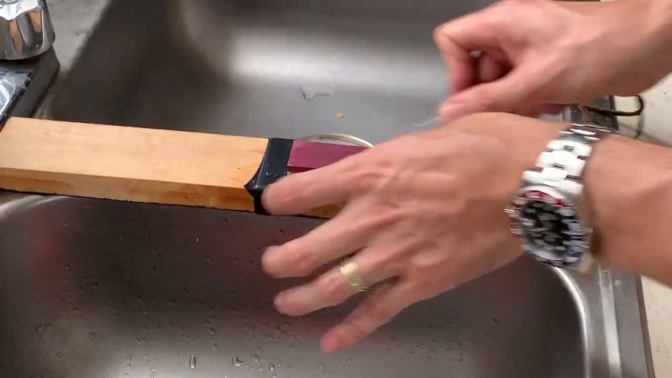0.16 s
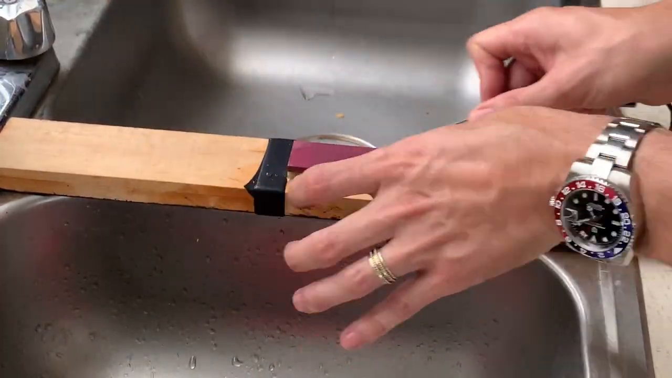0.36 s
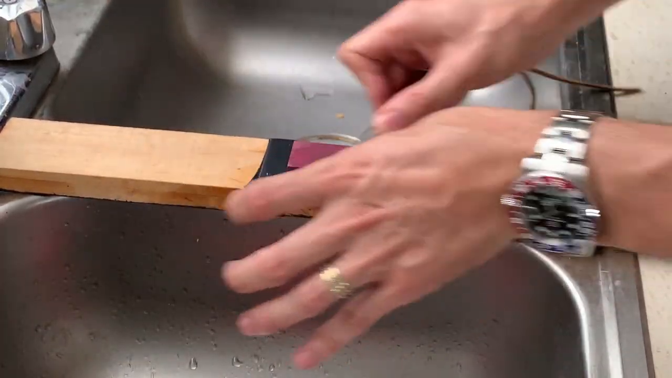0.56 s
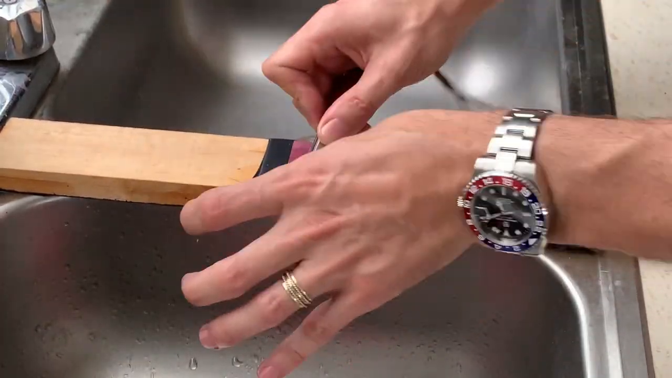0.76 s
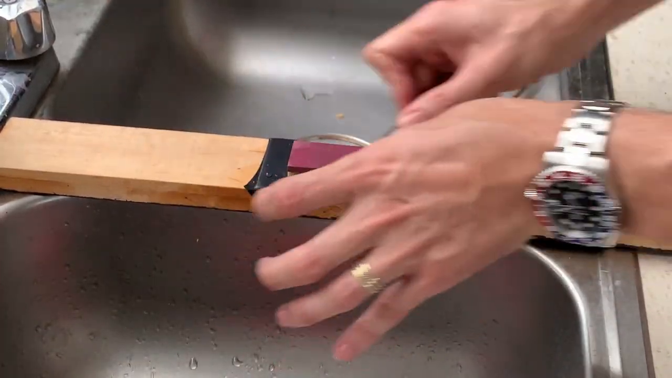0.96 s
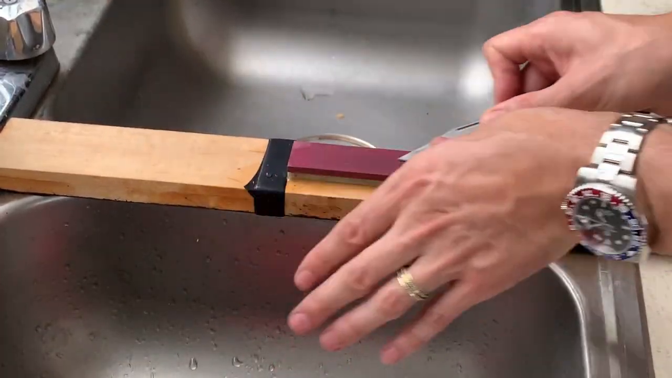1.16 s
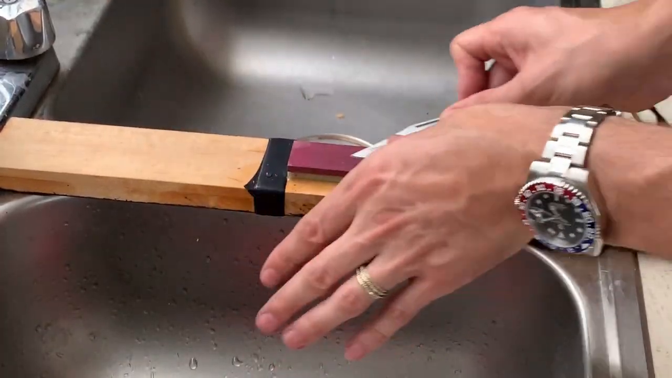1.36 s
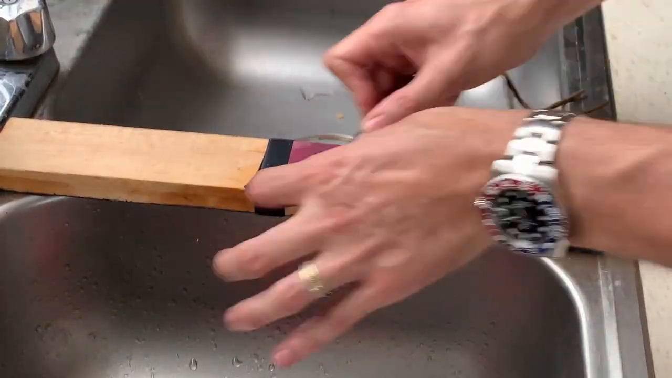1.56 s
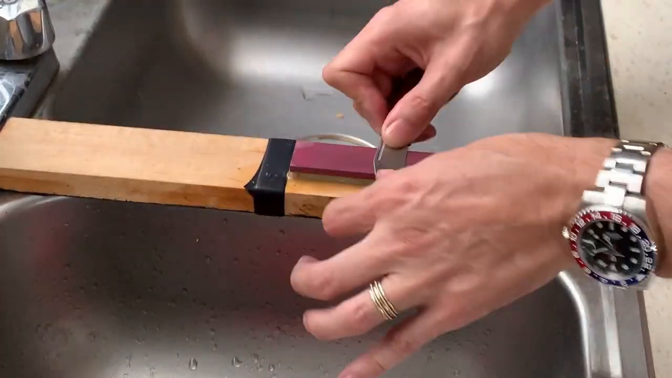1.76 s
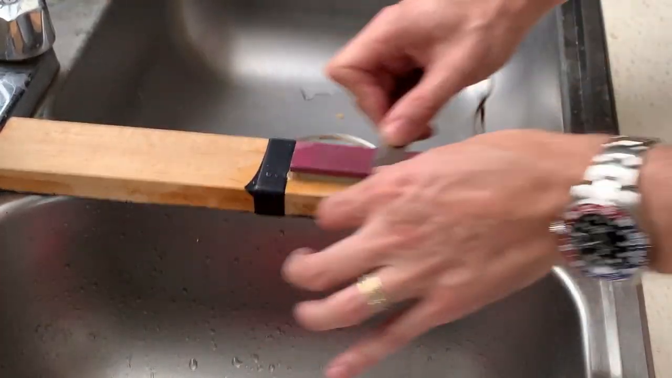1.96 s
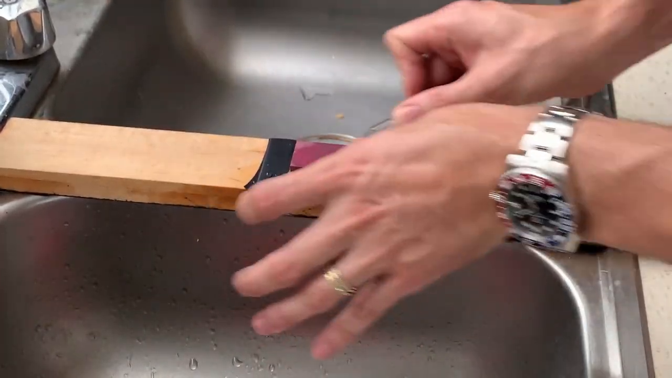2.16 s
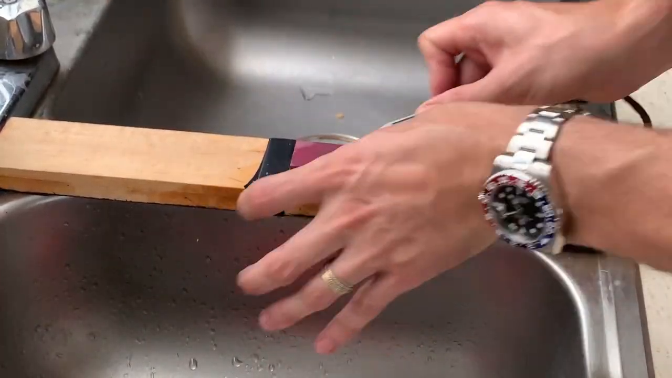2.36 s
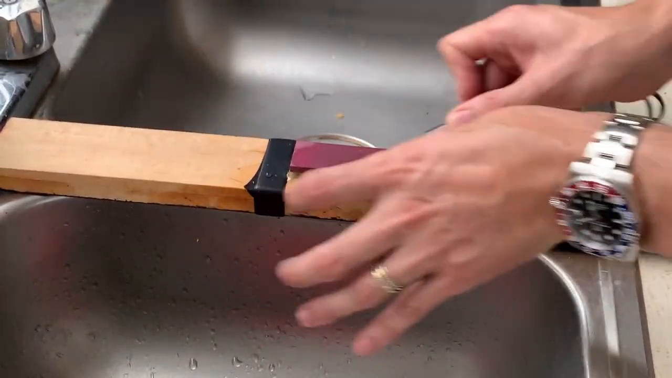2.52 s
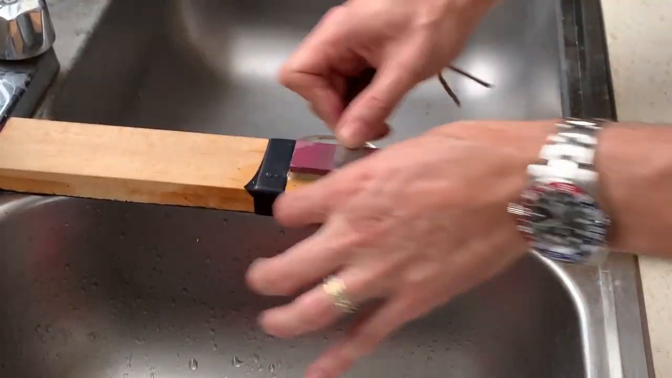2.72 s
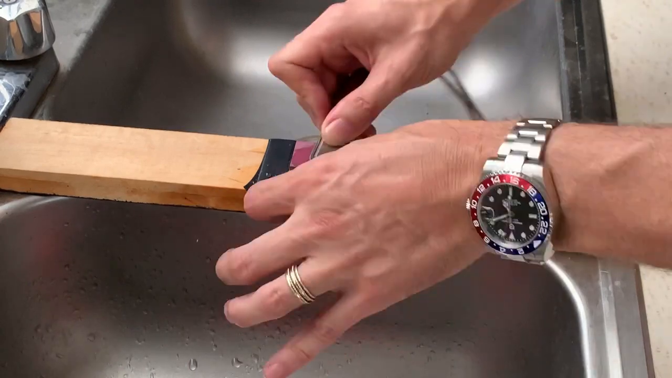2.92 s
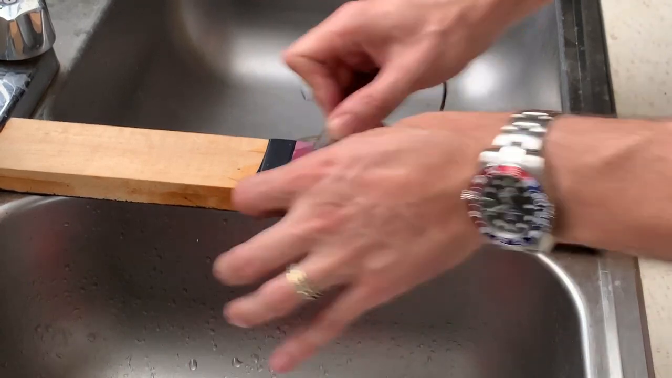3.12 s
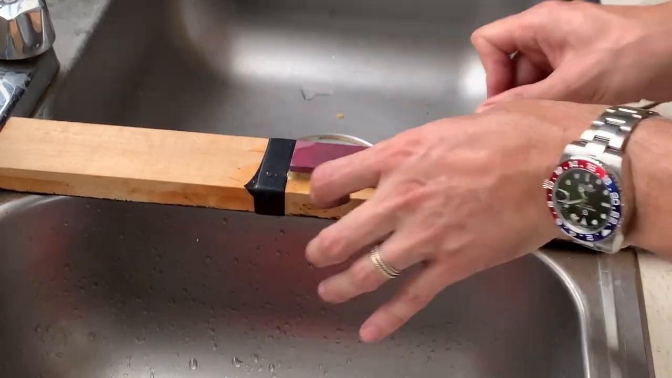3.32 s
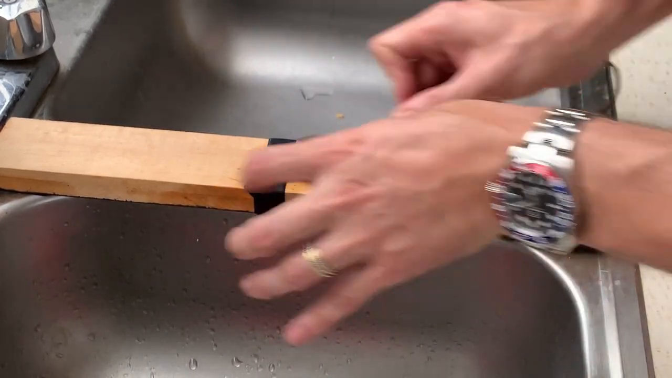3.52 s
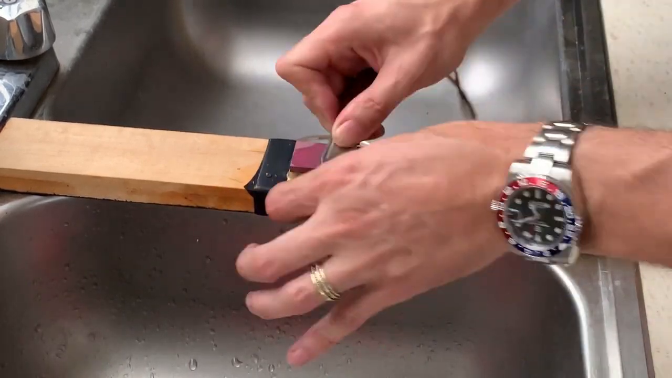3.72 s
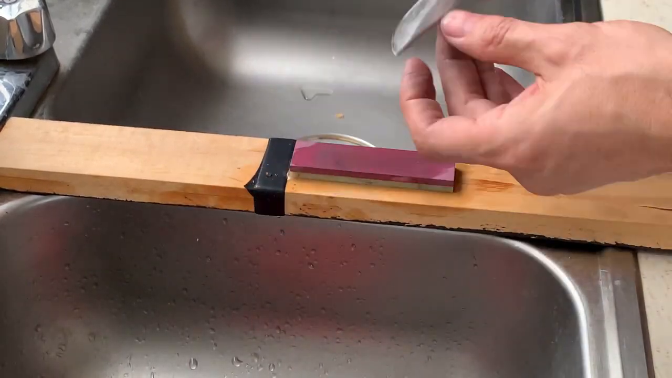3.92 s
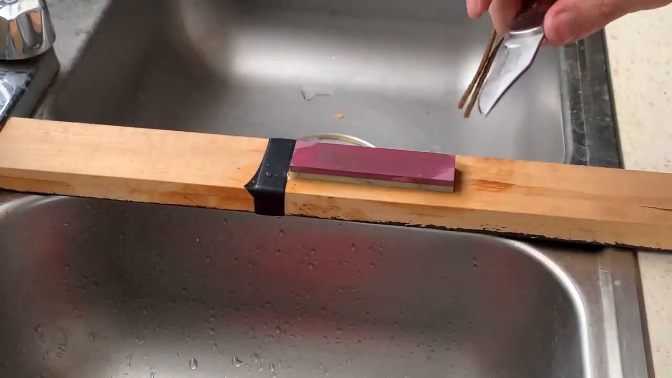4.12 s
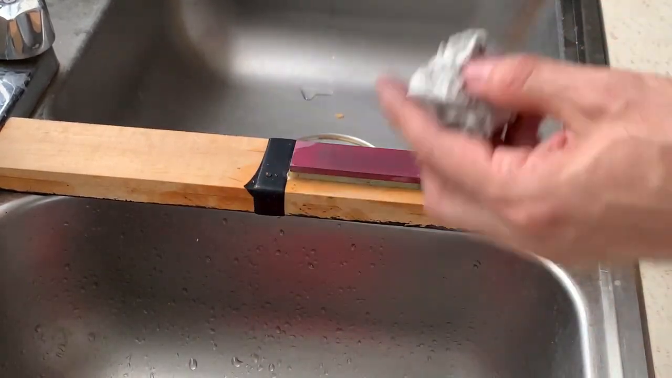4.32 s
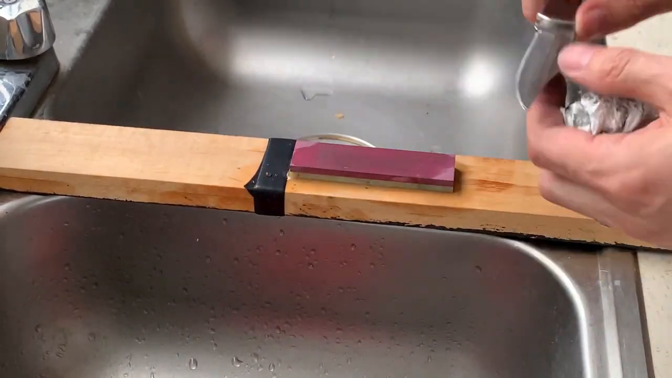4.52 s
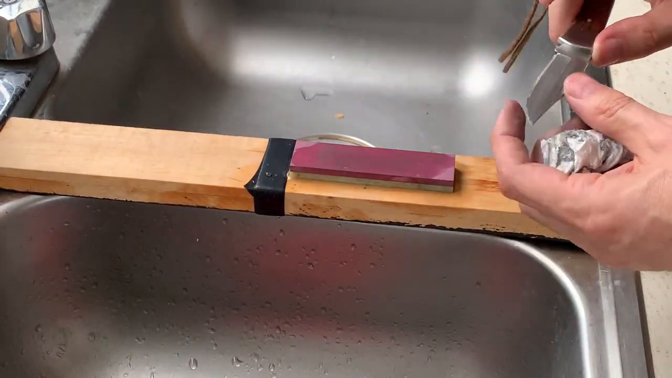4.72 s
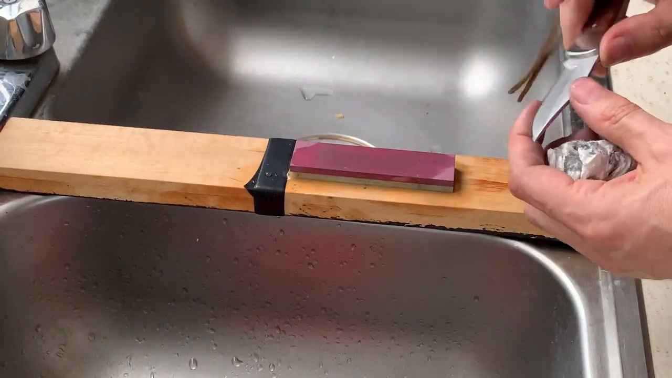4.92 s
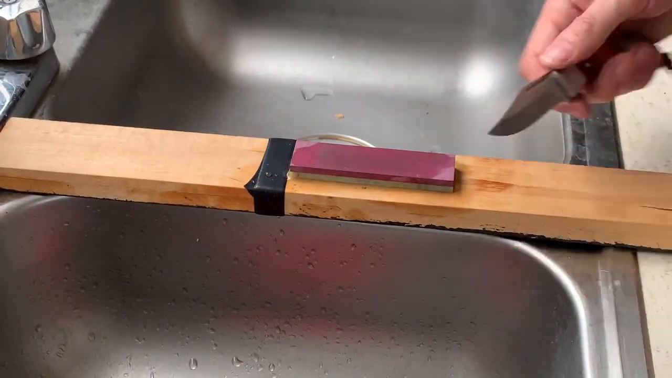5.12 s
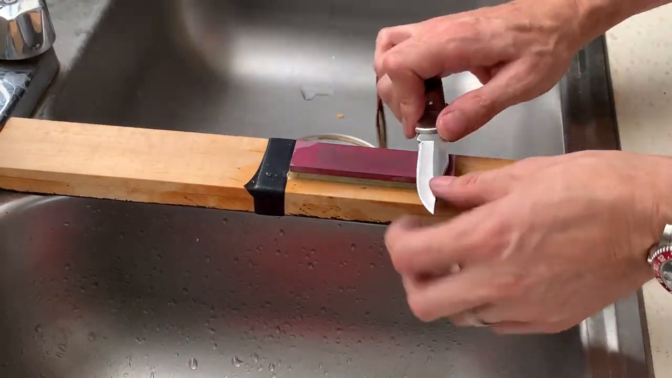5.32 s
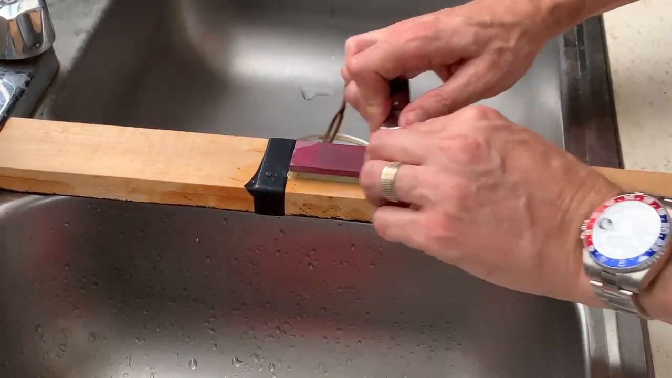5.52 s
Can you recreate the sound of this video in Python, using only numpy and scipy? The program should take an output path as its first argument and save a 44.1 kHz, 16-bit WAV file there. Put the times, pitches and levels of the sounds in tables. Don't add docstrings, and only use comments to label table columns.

```python
import sys
import numpy as np
from scipy import signal
from scipy.fft import rfft, irfft, next_fast_len
from scipy.io import wavfile
from scipy.ndimage import uniform_filter1d, map_coordinates

SR = 44100
rng = np.random.default_rng(int(sys.argv[2]) if len(sys.argv) > 2 else 0)


def makeup_ratio(level_db):
    decades = np.asarray(level_db, float) / 20
    return 10 ** decades


def to_wav(s):
    ch = np.atleast_2d(s).T
    pcm = np.round(np.clip(ch, -1, 1) * 32767)
    wavfile.write(sys.argv[1], SR, pcm.astype(np.int16))


N = 250488
T = np.arange(N) / SR

# f/Hz, width/Hz, level/dB
BLADE = [(3400, 87, -12.5), (4730, 53, -1.5), (5275, 66, 2.5), (5727, 114, -0.5), (6496, 130, 2.5),
         (7040, 48, 1.5), (6984, 204, 2.5), (8270, 150, -3), (8850, 130, -3), (9205, 62, 3),
         (9254, 74, 2.5), (9674, 48, -2), (9320, 240, -8), (10000, 104, -25)]
PLANK = [(1700, 104, -0.5), (1613, 140, -15)]
RIM = [(925.7, 60, 0)]
BOWL = [(189.7, 7.1, -5), (236.4, 16.3, -8), (282.4, 13.6, -6), (338.7, 69, -8), (402.8, 41.3, -0.5),
        (473.3, 28, -4), (532.6, 30.2, -3.5), (627.4, 39.7, -3)]
STONE = [(1132, 29, 0.5), (1259, 22, 0.5), (1506, 61, 1.5), (2110, 101, -2.5), (2740, 38, -2.5),
         (3128, 25, -11)]
HOLLOW = [(385, 41, -1.5), (525, 43, -0.5), (662, 59, -2), (766, 110, -9), (953, 55, -8.5), (1244, 42, -11)]
TAP = [(250, 120, -15.5), (420, 210, -25), (630, 196, -7), (990, 315, 0.5), (1270, 210, 7.5),
       (1600, 280, 8.5), (3570, 200, -6), (4440, 820, -10), (6170, 230, -27), (8100, 320, -25)]

# f/Hz, level/dB
RASP = [(2500, 4.5), (3200, -5.5), (4400, -4.5), (5300, -8.5), (6500, 5), (7700, -14), (9300, -2.5),
        (10500, -24), (11500, -23), (14000, -5), (15800, -16)]
BODY = [(200, -33.5), (300, -9), (500, -16.5), (750, -2.5), (850, -6), (1050, -20), (1300, -1), (1600, -3),
        (1900, -8), (2300, -8), (3000, -30), (3600, -29.5)]
SHEEN = [(2800, -73), (3400, -1), (4300, -4), (5000, -7.5), (9000, -4.5), (10300, -3), (12000, -10),
         (14000, -5), (15800, -8.5)]
SCRATCH = [(600, -12), (1000, -9), (2200, 4), (5000, 3), (8000, -1), (12000, -9), (15800, -22)]
ROOM = [(25, -48), (160, -61), (190, -16.5), (290, -14), (400, -6.5), (700, -11), (1000, -15.5),
        (1500, -19.5), (2500, -28), (4000, -32), (6500, -35.5), (8000, -36.5), (15800, -38)]
FLIPPED = [(200, -14), (400, -0.5), (780, 0.5), (1100, 2), (2400, 2), (3700, 7), (6000, 1.5), (9400, -4.5)]

# t/s, pushes done
BEAT = [(0.016, 0), (0.167, 3), (0.311, 6), (0.402, 8), (0.874, 18), (1.426, 30), (1.855, 39), (2.331, 49),
        (2.518, 53), (2.906, 61), (3.184, 67), (3.602, 76), (3.797, 80), (3.887, 82)]
# t/s, level/dB
SWEEP = [(0, 7), (.22, -11), (.82, 5), (1.0, 0.5), (1.35, -5), (1.68, 4.5), (2.05, 2), (2.35, -2),
         (2.62, 0), (2.8, 4), (3.12, 4.5), (3.42, -3), (3.76, 3), (3.9, 1), (5.6, -0.5), (5.68, 8.5)]
OPEN_GAIN = [0.23, -0.0317, -0.31]
# blade hiss level/dB, then plank and rim over it, level/dB
PUSH_DB, PUSH_SPREAD_DB = [-47.5, 6.5, 2.5], [-0.5, 4.5, -2]
PULL_DB, PULL_SPREAD_DB = [-49.5, 2, -2], [1, 4.5, 2]
# t/s, hiss level/dB, plank over hiss/dB, rim over hiss/dB
BITES = [(0.014, -47, 16, 2.5), (0.117, -44.5, 10.8, 4.5), (0.401, -56, 14, 9), (0.45, -42.5, 8.5, -3),
         (0.832, -46.5, 11.4, 4), (0.873, -44, 6.7, 5), (1.061, -46, 13.5, -3), (1.196, -51, 15.5, 13),
         (1.474, -46, 9.2, 4.5), (1.521, -51, 19.6, 11), (1.567, -41, 1.6, -10), (1.665, -42.5, 8.7, -6),
         (1.767, -42.5, 6.1, -2), (1.857, -40.5, 2.6, -12), (2.235, -46, 14.7, 5.5), (2.283, -45, 12, 1),
         (2.379, -45, 13, 7), (2.515, -44, 12.4, 7), (2.331, -47, 7.8, 10), (2.808, -37.5, 4.7, -7),
         (2.86, -43, 8.9, 2), (2.912, -40.5, 6.9, -2.5), (3.044, -45, 8.1, 1), (3.168, -48, 14.3, 7),
         (2.086, -46, 11, 5.5), (3.465, -51, 19, 5), (3.509, -46, 13, 6.5), (3.557, -43, 12, 3),
         (3.706, -41.5, 6.4, -1), (3.801, -42, 12.8, 0)]
STROKES = [(0.069, -44.5, 6.3, 3.5), (0.263, -47, 11.4, -1), (0.312, -48, 12, 0), (0.525, -47.5, 10, 1),
           (0.544, -41.5, 6.1, 1.5), (0.618, -48.5, 11.7, 3.5), (0.686, -45.5, 8.7, -11),
           (0.729, -48.5, 13, 3), (0.784, -47, 8.1, -1), (0.895, -49.5, 8.3, -12), (0.979, -50.5, 15, 6),
           (1.017, -54, 8.5, 10), (1.152, -46, 12, -1), (1.245, -48.5, 15.2, 5), (1.32, -48.5, 11, -2),
           (1.426, -44.5, 4.9, -7), (1.613, -45.5, 9.8, -2), (1.917, -51, 13, -9), (2.043, -44.5, 3.1, -1),
           (2.141, -48, 14, 9.5), (2.165, -47.5, 8, 1), (2.258, -48, 7, 0), (2.356, -53, 14, 2),
           (2.404, -51, 7.4, 5), (2.426, -46, 6.5, 5.5), (2.473, -50.5, 14.3, 7), (2.545, -50.5, 12, 0),
           (2.569, -44, 10, -8), (2.591, -49.5, 11, 5), (2.616, -44, 9.6, 3.5), (2.666, -46, 8.6, 5),
           (2.714, -46.5, 6, -10), (2.755, -44, 4, -7), (2.835, -65, 11, 0), (2.948, -42.5, 3.9, -3),
           (3.007, -46.5, 12.1, 1), (3.07, -49.5, 12, -2), (3.127, -48.5, 15.5, -8), (3.149, -56, 9.8, -6),
           (3.22, -59, 12, 6), (3.259, -46.5, 11.5, 0), (3.281, -47.5, 8.7, 2), (3.329, -47.5, 14.8, 1),
           (3.37, -47, 11.5, 3), (3.419, -52.5, 17, 12), (3.539, -67.5, 9.5, -6), (3.604, -46, 5.3, -4),
           (3.751, -43.5, 5.9, -6.5), (3.84, -45.5, 4.7, 2), (3.887, -47, 9.8, 2)]
RESTART = [(5.54, -53, 11.5, 14), (5.562, -44, 9.5, 5), (5.578, -50, 11, 12.5), (5.616, -50.5, 15, -12),
           (5.643, -42.5, 3, 0), (5.659, -57, 3, -27), (5.678, -48, 1, -13)]
# t/s, share of contact lost
SKIPS = [
    (1.093, 0.65),
    (5.593, 1),
]
# t/s, shift/Hz, level/dB
SETTLE = [(5.519, -150, 5), (5.55, -37, 1), (5.575, 6, -2), (5.595, -9, -1), (5.605, -66, -14),
          (5.625, -56, -18), (5.635, -20, 7.5), (5.655, 18, -2), (5.67, 20, -12)]
LIFT_S, LAND_S = 3.9, 5.519

# t/s, peak level/dB, f/Hz
CATCHES = [(0.0144, -26, 1930), (0.1605, -43, 2070), (0.2548, -41, 2150), (0.3047, -48, 2130),
           (0.395, -33, 2180), (0.4494, -34, 2150), (0.4963, -33, 2130), (0.5367, -38, 2030),
           (0.5856, -33, 2110), (0.7692, -36, 2030), (0.8619, -34, 2070), (1.0176, -39, 2210),
           (1.0505, -36, 2120), (1.0979, -38, 2120), (1.4651, -40, 2230), (1.5194, -33, 2220),
           (1.8552, -28, 2090), (1.9031, -46, 2110), (2.1864, -35, 2160), (2.2343, -40, 2080),
           (2.3236, -30, 2220), (2.376, -28, 2120), (2.4164, -34, 2120), (2.4618, -34, 2150),
           (2.616, -32, 2200), (2.6599, -35, 2070), (2.7038, -40, 2100), (2.8065, -30, 2150),
           (2.8589, -34, 2020), (2.9058, -32, 2110), (3.1667, -42, 1890), (3.2146, -48, 2100),
           (3.3209, -42, 2160), (3.3662, -38, 2080), (3.4545, -44, 2210), (3.5019, -40, 2110),
           (3.5578, -28, 2070), (3.5937, -39, 2120), (3.706, -21.5, 2120), (3.7988, -38, 1990),
           (5.552, -38, 2170), (5.56, -35, 2000), (5.567, -28, 1930), (5.578, -37.5, 1890),
             (5.5994, -35, 1910), (5.661, -35, 1930)]
# t/s, level/dB
SCRATCHES = [(0.8724, -31), (1.191, -38.5), (1.315, -42.5), (1.768, -41), (1.856, -28.5), (3.217, -42),
             (2.805, -35), (2.858, -33.5), (2.907, -33.5), (3.705, -39.5), (3.799, -31.5)]
# t/s, bowl level/dB, plank level/dB
THUMPS = [(0.398, -44, -24), (0.873, -36.5, -25), (1.7682, -60, -26), (1.8606, -57, -20), (2.325, -39, -25),
          (2.806, -36, -20), (2.907, -63, -22), (3.005, -38, -32), (3.217, -40, -25), (3.462, -34, -42),
          (3.706, -48, -23), (5.535, -37, -32), (5.613, -55, -25), (0.834, -53, -23), (1.191, -44, -23),
          (1.316, -55, -34), (2.081, -39, -26.5), (0.521, -61, -35), (1.471, -28, -19), (1.52, -29, -36),
          (2.8595, -41, -18.5), (3.799, -45, -16), (5.6591, -62, -21.5)]
# f/Hz, t60/s, length kept/s
THUMP = [
    (404, 0.09, 0.033),
    (1695, 0.07, 0.0076),
]
# t/s, length/s, level/dB, f/Hz
HUMS = [(0.4, 0.022, -49, 402.9), (0.778, 0.046, -45, 404), (0.994, 0.087, -43.5, 402.8),
        (1.141, 0.033, -50, 406), (1.241, 0.037, -45, 402), (1.336, 0.037, -46, 403),
        (1.462, 0.11, -50, 407.3), (1.673, 0.062, -46, 396.0), (1.8, 0.035, -49, 398),
        (1.986, 0.043, -48, 399.7), (2.082, 0.078, -49, 410), (2.175, 0.046, -43.5, 400),
        (2.513, 0.064, -52, 395), (2.802, 0.062, -45, 411), (3.231, 0.073, -50.5, 414.8),
        (3.358, 0.023, -49, 412), (3.403, 0.051, -46, 388.5)]
# t/s, length/s, level/dB, f/Hz
DRONES = [(1.098, 0.089, -62.5, 281.4), (1.474, 0.083, -70, 287.0), (1.66, 0.055, -58.5, 284.2),
          (1.75, 0.086, -58, 282.6), (1.933, 0.12, -61, 275.9), (2.119, 0.108, -58, 281.0),
          (2.538, 0.22, -57, 281.9), (2.941, 0.4, -57.5, 279.6), (3.408, 0.042, -59, 281.5),
          (3.696, 0.2, -56.5, 282.4)]
# t/s, peak level/dB, t60/s
TAPS = [
    (5.328, -71, .02),
    (5.335, -47.5, 0.068),
    (5.349, -55.5, 0.023),
    (5.37, -58, 0.0192),
    (5.399, -62.5, 0.023),
    (5.404, -67.5, 0.018),
    (5.41, -65.5, 0.016),
]
# f/Hz, level/dB, t60/s
LANDING = [(2740, -50.5, 0.12), (3850, -49, .05), (4530, -43, 0.027), (6430, -52, .05), (8070, -46, 0.022)]
# t/s, level/dB, f/Hz
BUMPS = [(4.253, -66, 405), (4.358, -59, 530), (4.37, -63, 480), (4.4, -65, 429), (4.431, -65, 394)]
# t/s, length/s, level/dB, lowest f/Hz, highest f/Hz
RUSTLES = [(4.106, .03, -78, 7060, 15000), (4.254, 0.0036, -61.5, 4000, 9000),
           (4.272, 0.0088, -57, 3890, 4200), (4.278, .03, -76.5, 4000, 15000),
           (4.384, .008, -75.5, 6960, 15000), (4.484, 0.036, -71, 2800, 14700),
           (4.57, 0.011, -79, 7000, 14900), (5.212, 0.011, -71.5, 1700, 9900),
           (5.417, 0.0028, -71, 7000, 15000), (5.436, 0.0057, -61, 5300, 6300)]
# t/s, level/dB, rise/s, t60/s
KNOCKS = [(3.9, -56, .01, 0.44), (3.96, -70.5, 0.0087, 1.8), (4.27, -67.5, 0.037, 0.18),
          (4.36, -60.5, 0.009, 0.4), (4.4, -65, 0.01, 0.46), (5.4, -58, 0.19, 0.32)]

# f/Hz, coherence
ALIKE = [(170, .98), (2200, 0.98), (3000, 0.72), (4400, 0.53), (7200, 0.5), (7600, 0.91), (11500, 0.94),
         (14000, 0.55)]
# f/Hz, level/dB
LEAN = [(60, -1), (130, 0.5), (290, 2.5), (640, 1.5), (1410, 1.0), (3100, -0.5), (6820, 1.5), (15000, 3)]
# f/Hz, phase/rad
LEAD = [(4050, 0), (4390, -2.3), (4740, -6), (5510, -6.5), (5940, -7.5), (6460, -7), (6800, -10.5),
        (7240, -4 * np.pi)]


def whetting():
    when, hiss_db, plank_db, rim_db = strokes()
    open_db = np.interp(T, *np.transpose(SWEEP))
    on = contact()
    s, *held = np.transpose(SETTLE)
    shift_hz, mute_db = (np.interp(T, s, column, left=0) for column in held)

    edge = dragged(slivers(when, hiss_db, 0.0038, 0.0071, lag=-0.0033), on, -2.5)
    plank = dragged(slivers(when, plank_db, 0.0055, 0.0078, lag=0.001), on, -4.5)
    rim = dragged(slivers(when, rim_db, 0.0054, 0.011, lag=0.0015), on, -8.5)
    flutter = on * edge / slow(edge)
    loose = (plank + 1e-6) ** 0.42 * slow(plank) ** 0.57 * on

    slide_hz = 69.78 * wobble(25) + 8 * open_db
    blade = makeup_ratio(-1.0) * shifted(steel(), slide_hz)
    rasp = makeup_ratio(-4.5 + 1.5 * wobble(50)) * ringing(shape(RASP), 2.7, 500)
    sheen = makeup_ratio(-55 + open_db + 1.7 * wobble(50)) * flutter * ringing(shape(SHEEN), 2.3, 500)

    wood = makeup_ratio(-2.9) * plank * steady(ringing(sharp(PLANK), 1.8, 330), share=0.46)
    body = makeup_ratio(-7.5 + 2.15 * wobble(60)) * loose * ringing(shape(BODY), 3.1, 300)
    stone_db = -10.0 - 0.039 * open_db + 1.44 * wobble(45)
    stone = makeup_ratio(stone_db) * loose * ringing(modes(STONE), 6.1, 300)

    basin_ring = steady(ringing(sharp(RIM), 1.3, 200), share=0.6)
    basin = makeup_ratio(0.5 + mute_db) * rim * shifted(basin_ring, shift_hz)
    bowl_db = -49.5 + 0.14 * open_db + 0.43 * wobble(40)
    bowl_ring = steady(ringing(sharp(BOWL), 2.05, 150), share=0.11)
    bowl = on * makeup_ratio(bowl_db) * (flutter + 0.00101) ** 0.37 * bowl_ring

    whole = edge * (blade + rasp) + sheen + wood + body + stone + basin + bowl
    other_face = filtered(whole * (T > LAND_S), lambda f: makeup_ratio(along(FLIPPED, f)))
    return np.where(T < LAND_S, whole, other_face)


def strokes():
    pull_share, scatter_s = 0.5, 0.0038
    s, done = np.transpose(BEAT)
    half = np.arange(2 * int(done[-1]) + 1)
    pull = (half % 2)[:, None]
    luck = rng.standard_normal((len(half), 4))
    when = np.interp(half // 2 + pull[:, 0] * pull_share, done, s) + scatter_s * luck[:, 0]
    spread = np.where(pull, PULL_SPREAD_DB, PUSH_SPREAD_DB)
    level = np.where(pull, PULL_DB, PUSH_DB) + spread * luck[:, 1:]
    level += np.outer(np.interp(when, *np.transpose(SWEEP)), OPEN_GAIN)
    gap = np.abs(when[:, None] - np.transpose(BITES + STROKES)[0]).min(axis=1)
    regular = np.c_[when, level][gap > .012]
    when, hiss_db, plank_db, rim_db = np.vstack([regular, BITES, STROKES, RESTART]).T
    return when, hiss_db, hiss_db + plank_db, hiss_db + rim_db


def contact():
    leaving, returning = 1 - (T - LIFT_S) / 0.018, (T - LAND_S) / 0.014
    on = np.clip(np.maximum(leaving, returning), 0, 1)
    for s, lost in SKIPS:
        on = on * (1 - lost * np.clip(1 - np.abs(T - s) / 0.0065, 0, 1))
    return on


def slivers(when, level_db, rise, fall, lag):
    power = np.zeros(N)
    power[np.clip(((when + lag) * SR).astype(int), 0, N - 1)] = makeup_ratio(2 * level_db)
    t = np.arange(-2000, 2001) / SR
    bump = np.exp(-(t / np.where(t < 0, rise, fall)) ** 2)
    return np.sqrt(np.abs(signal.fftconvolve(power, bump, "same")))


def slow(envelope):
    return np.sqrt(np.abs(uniform_filter1d(envelope ** 2, size=5000)) + 1e-12)


def dragged(envelope, on, drag_db):
    return np.hypot(envelope, on * makeup_ratio(drag_db) * slow(envelope))


def grit(clump_db, rate):
    return unit(rng.standard_normal((2, N)) * makeup_ratio(clump_db * wobble(rate)))


def ringing(response, clump_db, rate):
    return unit(filtered(grit(clump_db, rate), response))


def steel():
    bite = grit(2.2, 500)
    rings = 0
    for group in (BLADE[:4], BLADE[4:8], BLADE[8:]):
        rings = rings + makeup_ratio(1.6 * wobble(45)) * filtered(bite, modes(group))
    return unit(rings)


def catches():
    out, t = np.zeros((2, N + SR)), np.arange(1500) / SR
    for s, db, hz in CATCHES:
        crack = rng.standard_normal((2, len(t))) * makeup_ratio(-60 * t / 0.0079)
        ring = makeup_ratio(-60 * t / 0.022) * np.sin(2 * np.pi * hz * t) * (1 - np.exp(-t / 0.001))
        start = round(s * SR)
        out[:, start:start + len(t)] += makeup_ratio(db + 3) * (ring * [[1], [0]] + 0.45 * crack)
    return filtered(out[:, :N], lambda f: 1 / (1 + 1j * f / 6000) ** 2)


def scratches():
    out, t = np.zeros((2, N)), np.arange(800) / SR
    for s, db in SCRATCHES:
        burst = makeup_ratio(db - 60 * t / 0.024) * rng.standard_normal((2, len(t)))
        out[:, round(s * SR):][:, :len(t)] += burst
    return filtered(out, shape(SCRATCH))


def thumps():
    out, t = np.zeros((2, N + SR)), np.arange(SR // 8) / SR
    for s, *levels in THUMPS:
        ring = 0
        for db, (hz, t60, kept) in zip(levels, THUMP):
            ring = ring + makeup_ratio(db - 60 * t / t60) * np.exp(-(t / kept) ** 4) * np.sin(2 * np.pi * hz * t)
        start = round(s * SR)
        out[0, start:start + len(t)] += ring * (1 - np.exp(-t / 0.0029))
    return out[:, :N]


def hums():
    edge_s = .012
    out = np.zeros((2, N))
    for s, length, db, hz in HUMS + DRONES:
        t = np.arange(round((length + 2 * edge_s) * SR)) / SR
        gate = np.clip(np.minimum(t, t[-1] - t) / (2 * edge_s), 0, 1)
        out[0, round((s - edge_s) * SR):][:len(t)] += makeup_ratio(db + 0.5) * gate * np.sin(2 * np.pi * hz * t)
    return out


def taps():
    drive = np.zeros((2, N))
    noise = rng.standard_normal((2, N))
    for s, db, t60 in TAPS:
        drive += noise * makeup_ratio(db + 18.0 - 60 * np.abs(T - s) / t60) * (T >= s)
    t = np.clip(T - 5.3352, 0, None)
    knock = makeup_ratio(-26.5 - 60 * t / 0.027) * np.sin(2 * np.pi * 1666 * t) * (1 - np.exp(-t / 0.00063))
    for hz, db, t60 in LANDING:
        knock += makeup_ratio(db - 60 * t / t60) * np.sin(2 * np.pi * hz * t)
    fading = drive * np.where(T < 5.362, 1, makeup_ratio(-9))
    scrape = filtered(fading, lambda f: makeup_ratio(along(RASP, f)) * f ** 4 / (f ** 4 + 2500 ** 4))
    return filtered(drive, modes(TAP)) + makeup_ratio(-15.5) * scrape + knock * [[1], [0]]


def bumps():
    out = np.zeros(N)
    for s, db, hz in BUMPS:
        t = np.clip(T - s, 0, .1)
        swell = t / 0.01 * np.exp(-t / 0.01) * (t < .1)
        out += makeup_ratio(db + 10.5) * swell * np.sin(2 * np.pi * hz * t)
    return out * [[1], [0]]


def rustles():
    out, crackle = np.zeros((2, N)), grit(2.2, 700)
    for s, length, db, low_hz, high_hz in RUSTLES:
        gate = np.exp(-((T - s - length / 2) / (0.63 * length)) ** 4)
        band = lambda f: f ** 6 / (f ** 6 + low_hz ** 6) / (1 + (f / high_hz) ** 6)
        out += makeup_ratio(db) * filtered(crackle * gate, band)
    return out


def room():
    power = makeup_ratio(2 * -71.5)
    for s, db, rise, t60 in KNOCKS:
        drop_db = np.where(T < s, 20 * (s - T) / rise, 60 * (T - s) / t60)
        power = power + makeup_ratio(2 * (db - drop_db)) * (T > LIFT_S)
    air = makeup_ratio(-71.0) * unit(filtered(rng.standard_normal((2, N)), shape(ROOM)))
    hollow = steady(filtered(grit(2.7, 130), modes(HOLLOW)), share=0.48)
    return air + np.sqrt(power) * hollow


def walls(x, t60, level_db):
    t = np.arange(SR // 4) / SR
    tail = rng.standard_normal((2, len(t))) * makeup_ratio(-60 * t / t60) * (t > .004)
    return makeup_ratio(level_db) * signal.fftconvolve(x, tail / np.linalg.norm(tail[0]), axes=1)[:, :N]


def ports(pair):
    turn = lambda f: np.arccos(np.clip(along(ALIKE, f), 0, 1)) / 2
    mid, side = filtered(pair, lambda f: np.array([np.cos(turn(f)), np.sin(turn(f))]))
    tilt = lambda f: makeup_ratio(along(LEAN, f) / 2) * np.exp(.5j * along(LEAD, f))
    return filtered(np.array([mid + side, mid - side]), lambda f: np.array([tilt(f), 1 / tilt(f)]))


def folding(pair):
    mid, side = (pair[0] + pair[1]) / 2, (pair[0] - pair[1]) / 2
    luck = uniform_filter1d(rng.standard_normal(N // 1024 + 2), size=2)
    wide = np.repeat(luck > np.quantile(luck, 1 - .35), 1024)[:N]
    keep = uniform_filter1d(np.where(wide, 1, makeup_ratio(-15.5)), size=600)
    treble = filtered(side, lambda f: (f > 7300) * (np.abs(f - 9300) > 350))
    side = side - (1 - keep) * treble
    return np.array([mid + side, mid - side])


def unit(x):
    return x / np.sqrt(np.mean(x ** 2) + 1e-20)


def along(points, hz):
    f, v = np.transpose(points)
    return np.interp(np.log(hz + 1), np.log(f + 1), v)


def filtered(x, response):
    m = next_fast_len(N + 8192)
    return irfft(rfft(x, m) * response(np.fft.rfftfreq(m, 1 / SR)), m)[..., :N]


def modes(table):
    def response(f):
        total = 0
        for k, (c, w, db) in enumerate(table):
            total = total + (-1) ** k * makeup_ratio(db) * 1j * f * w / (c * c - f * f + 1j * f * w)
        return total
    return response


def sharp(table):
    return lambda f: modes(table)(f) ** 2


def shape(spectrum):
    return lambda f: makeup_ratio(along(spectrum, f)) * (f > spectrum[0][0]) * (f < spectrum[-1][0])


def wobble(rate):
    return map_coordinates(rng.standard_normal(int(N * rate / SR) + 4), [T * rate])


def steady(x, share):
    swell = np.abs(signal.hilbert(x[0], next_fast_len(N))[:N])
    return unit(x / (swell / swell.mean() + 0.19) ** share)


def shifted(x, shift_hz):
    turn = np.exp(2j * np.pi * np.cumsum(shift_hz) / SR)
    return np.real(signal.hilbert(x, next_fast_len(N), axis=1)[:, :N] * turn)


def scene():
    work = whetting() + catches() + thumps() + taps() + hums() + scratches()
    reverberant = work + walls(work, t60=0.082, level_db=-14.5)
    return ports(reverberant + rustles() + room() + bumps())


def top_cut(x):
    return signal.sosfilt(signal.butter(12, 16500, fs=SR, output="sos"), x)


def record(dry):
    cut = lambda f: (f < 15800) * (f / 175) ** 6 / (1 + (f / 175) ** 6)
    loudness = np.sqrt(np.abs(uniform_filter1d(dry ** 2, size=1000, axis=1)))
    noise = rng.standard_normal((3, N))
    stirred = loudness * (0.67 * noise[:2] + 0.82 * noise[2])
    rumble = filtered(stirred, lambda f: makeup_ratio(-28.5) / (1 + (f / 150) ** 4))
    return top_cut(folding(filtered(dry, cut)) + rumble)


dry = scene()
out = record(dry)
to_wav(out)
```